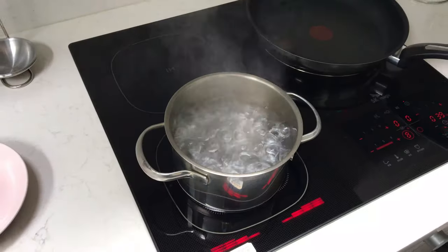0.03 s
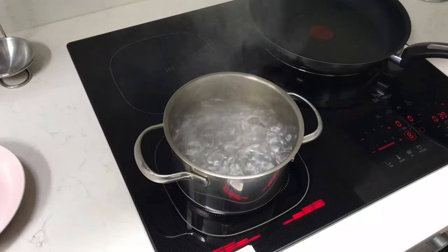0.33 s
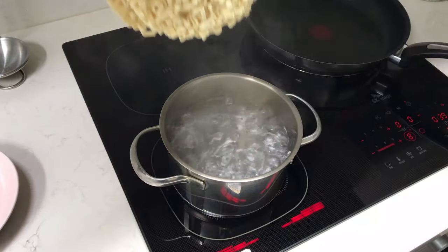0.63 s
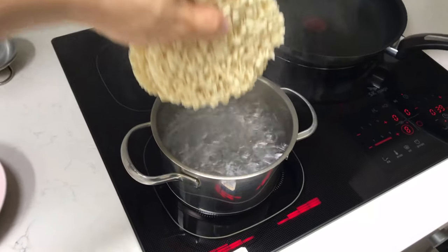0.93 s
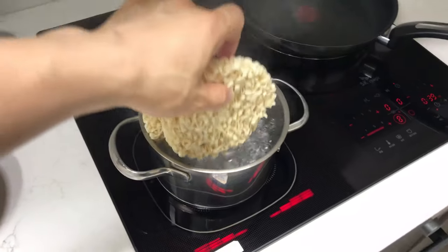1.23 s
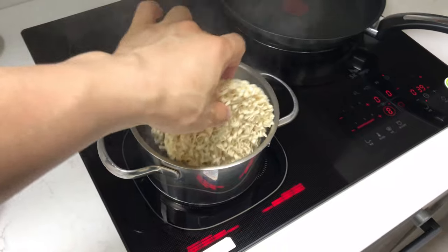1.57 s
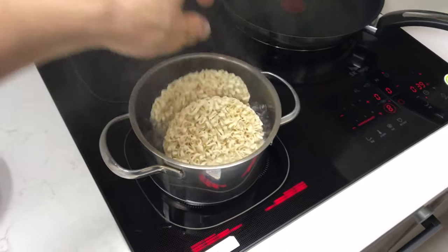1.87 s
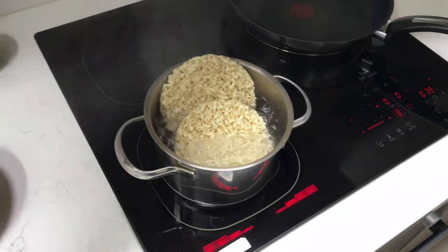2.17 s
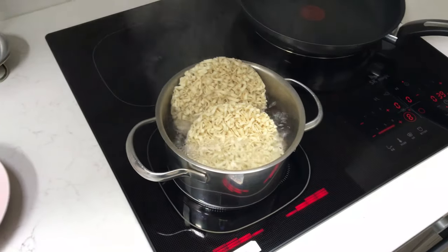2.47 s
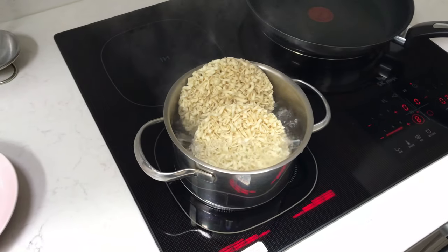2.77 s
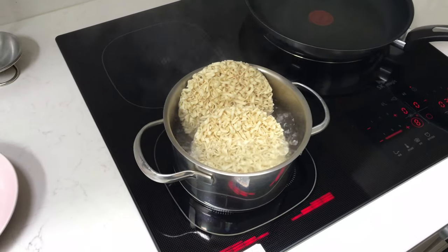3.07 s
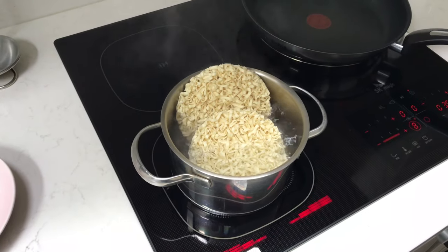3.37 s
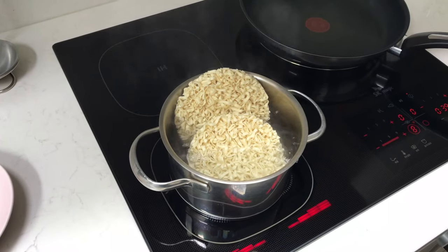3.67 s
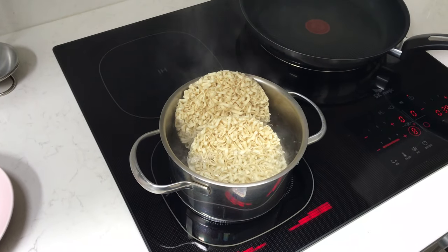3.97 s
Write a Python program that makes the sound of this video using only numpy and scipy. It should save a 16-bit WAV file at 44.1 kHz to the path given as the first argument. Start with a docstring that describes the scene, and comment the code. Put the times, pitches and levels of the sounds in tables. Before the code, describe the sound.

Water boils in a steel pot, rumbling, plopping and fizzing close by in a small kitchen. Dry noodle cakes go in with a few knocks, a scrape and crackles. The fizz then dulls while the cooktop's hum grows.

```python
"""Water boils in a steel pot in a small kitchen: a rumble, plopping bubbles and the fine fizz of foam,
over a humming cooktop. Just after the start the sound drops out for a moment. Two dry noodle cakes are
lowered in: they bump the pot and make it ring, scrape along its wall and crackle as strands snap.
They cover the water and dull the fizz, and the hum grows louder toward the end."""
import sys
import numpy as np
from scipy import signal
from scipy.fft import rfft, irfft, next_fast_len
from scipy.io import wavfile
from scipy.ndimage import map_coordinates

SR = 44100
rng = np.random.default_rng(int(sys.argv[2]) if len(sys.argv) > 2 else 0)


def to_wav(sig):
    """Store sig (one row per channel, or 1-D mono) as 16-bit WAV at the path in sys.argv[1].

    Samples outside -1..1 are clipped; the rate is SR.
    """
    pcm = np.clip(np.atleast_2d(sig), -1, 1) * 32767
    pcm = np.round(pcm).astype(np.int16)
    wavfile.write(sys.argv[1], SR, pcm.T)  # frames by channels


N = 176400
T = np.arange(N) / SR

# how long the room echoes; a t60 is the time to fade by 60 dB (frequency [Hz], t60 [s])
ROOM_DECAY = [(150, 0.24), (1500, 0.28), (12000, 0.37)]
# loudness of the cooktop's hum (time [s], level [dB])
HUM_LEVEL = [(0, -61.5), (1.5, -60), (2.2, -58), (2.65, -52.5), (3.3, -50.5), (4, -46.5)]
# tones in the hum (multiple of its pitch [-], relative level [dB])
HUM_TONES = [(1, 8), (2, -11), (3, -18.5), (4, -47)]
# tones in the fan's whine (pitch [Hz], level [dB])
FAN_TONES = [(948, -81), (1067, -73.5), (1109, -79.5), (1210, -82), (3130, -87.5), (3252, -91),
             (6840, -112)]
# tone of the surging hiss (frequency [Hz], relative level [dB])
SURGE_SPECTRUM = [(1500, 0), (3500, -1.5), (6500, -1.5), (10500, -4.5), (16000, -5.5)]
# tone of the lone tick (frequency [Hz], relative level [dB])
TICK_SPECTRUM = [(30, 13), (200, 7), (1200, -2), (4000, -13), (8000, -19), (16000, -24)]
# loudness of the open pot's low drone (time [s], level [dB])
DRONE_LEVEL = [(0, -79), (.3, -54.5), (1, -56), (1.5, -68), (2, -54), (2.3, -57.5), (4, -53)]
# where that drone rings (pitch [Hz], width [Hz], relative level [dB])
DRONE_MODES = [(107, 9.3, 0)]
# where the air above the water rings (pitch [Hz], width [Hz], gain [dB])
AIR_MODES = [(434, 51, -6), (946, 63, 8), (1070, 120, -7), (1534, 210, 2), (2860, 480, -25)]
# loudness of the boil (time [s], relative level [dB])
BOIL_LEVEL = [(0, -53.5), (.1, -55), (.25, -52), (.9, -52.5), (1.45, -53), (1.95, -49), (2.35, -54),
              (3, -53.5), (4, -52)]
# tone of the rolling water (frequency [Hz], relative level [dB])
RUMBLE_SPECTRUM = [(20, -57), (33, -11.5), (48, -14), (62, -4), (78, -5), (105, -9.5), (145, -8.5),
                   (195, -14.5), (255, -11.5), (310, -12), (420, -14.5), (520, -20.5), (780, -26.5),
                   (950, -23.5), (1500, -26), (2500, -41.5), (4000, -59)]
# loudness of the fizz (time [s], relative level [dB])
FIZZ_LEVEL = [(0, -75.5), (.07, -67), (.13, -63), (.4, -64), (1.44, -64), (1.71, -62), (1.88, -66.5),
              (2.12, -67.5), (2.34, -68), (2.7, -67.5), (3.3, -69), (4, -70)]
# tone of the fizz on open water (frequency [Hz], relative level [dB])
OPEN_SPECTRUM = [(500, -19), (1500, 4), (3000, 3), (4800, -1), (7200, -0.5), (10300, -4), (13000, -3),
                 (16000, -6.5)]
# tone of the fizz under the noodles (frequency [Hz], relative level [dB])
COVERED_SPECTRUM = [(500, -24), (1500, 9), (2400, 4), (3300, 5.5), (4700, 1), (8500, -0.5), (10400, -6),
                    (12000, -0.5), (16000, -3.5)]
# bubbles that burst clearly (time [s], peak level [dB], pitch [Hz])
CLEAR_POPS = [(0.158, -46, 2930), (0.2165, -49, 3730), (0.455, -48.5, 920), (0.535, -49, 1320),
              (.633, -42.5, 460), (0.699, -45, 2880), (.771, -45.5, 3100), (.854, -46, 896),
              (0.948, -43.5, 3020), (1.302, -46.5, 1580), (1.449, -42, 2790), (2.328, -46.5, 2570),
              (2.562, -38.5, 910), (2.819, -47, 910)]
# loudness of the cakes scraping the wall (time [s], relative level [dB])
SCRAPE_LEVEL = [(1.35, -75), (1.55, -68), (1.66, -61), (1.69, -55.5), (1.74, -54), (1.8, -55.5),
                (1.85, -68), (1.92, -72), (2.02, -64), (2.12, -62.5), (2.25, -70)]
# tone of the scrape (frequency [Hz], relative level [dB])
SCRAPE_SPECTRUM = [(300, -19), (1000, 3.5), (2200, -1.5), (3600, -1.5), (7000, -7.5), (11000, -7),
                   (16000, -15.5)]
# strands snap and drops spit (time [s], peak level [dB], pitch [Hz], t60 [s])
STRAND_SNAPS = [(.4865, -45, 7100, 0.016), (0.5704, -45.5, 6300, .027), (.7017, -30, 11800, 0.0054),
                (0.886, -44, 6300, 0.019), (1.02, -49, 6900, .019), (1.675, -38, 7460, 0.034),
                (1.6807, -28.5, 8900, 0.018), (1.731, -37, 7900, .06), (1.7825, -39, 4550, 0.047),
                (1.7966, -36, 6800, 0.004), (1.8055, -39.5, 4440, 0.016), (1.8317, -30, 12700, 0.054),
                (1.879, -38.5, 8150, 0.0036), (2.069, -46, 2300, 0.034), (2.092, -41.5, 7100, .025),
                (2.095, -42.5, 1980, 0.027), (2.121, -42.5, 2360, 0.03)]
# notes of the bumped pot and cooktop (pitch [Hz], relative level [dB], t60 [s])
POT_MODES = [(107.4, 6, 0.16), (146, 0, 0.14), (203, -14.5, 0.1), (253.3, -0.5, 0.12), (291, -6.5, 0.077),
             (351.7, -2.5, 0.16), (403, -7, 0.093), (590, -12, 0.084), (720, -13, .06), (882, -7.5, 0.058),
             (1340, -17, 0.036), (1770, -4, 0.041)]
# tone of a cake pushing on the pot (frequency [Hz], relative level [dB])
PUSH_SPECTRUM = [(50, -25), (150, 3), (400, -4.5), (560, -39), (1100, -16), (2500, -19), (6000, -38)]
# cakes bump the pot (time [s], peak level [dB], low edge of band [Hz], high edge of band [Hz])
CAKE_BUMPS = [(1.275, -28.5, 284, 890), (1.302, -37.5, 480, 1300), (1.676, -26, 90, 1420),
              (1.708, -41, 280, 1000), (1.733, -35.5, 70, 900), (1.7811, -23.5, 101, 475),
              (1.801, -44.5, 90, 330), (1.819, -33, 240, 380), (1.872, -41.5, 280, 1200),
              (2.072, -37.5, 300, 450), (2.095, -30.5, 290, 420), (2.123, -35.5, 300, 440),
              (3.066, -40, 30, 390)]

COVER_S = (1.45, 1.86)  # the cakes cover the water between these times


def amp(db):
    """Turn decibels into a gain."""
    return 10 ** (np.asarray(db) / 20)


def unit(x):
    """Scale a sound to an average (rms) level of 1."""
    return x / np.sqrt(np.mean(x ** 2) + 1e-20)


def along(points, hz):
    """Read between (frequency, value) points on a log frequency axis."""
    f, values = np.transpose(points)
    return np.interp(np.log(hz + 1), np.log(f + 1), values)


def level(rows):
    """A gain for every sample, from (time, level) points."""
    return amp(np.interp(T, *np.transpose(rows)))


def wobble(rate):
    """A smooth curve through `rate` random points a second."""
    return map_coordinates(rng.standard_normal(400), [T * rate], mode="wrap")


def filtered(x, response):
    """Multiply each frequency in a sound by response(frequency)."""
    size = next_fast_len(len(x) + 8192)
    return irfft(rfft(x, size) * response(np.fft.rfftfreq(size, 1 / SR)), size)[:len(x)]


def coloured(x, spectrum):
    """Shape a sound's tone, then scale it to level 1."""
    return unit(filtered(x, lambda f: amp(along(spectrum, f))))


def ringing(modes, f):
    """The response of something that rings at a few pitches, called its modes."""
    return sum((-1) ** k * amp(db) * 1j * f * width / (hz * hz - f * f + 1j * f * width)
               for k, (hz, width, db) in enumerate(modes))


def fade(t, t60):
    """A gain that falls by 60 dB every t60 seconds."""
    return amp(-60 * t / t60)


def add(track, start, x, peak_db):
    """Place a sound at a time with a peak level."""
    part = track[round(start * SR):][:len(x)]
    part += amp(peak_db) * x[:len(part)] / np.abs(x).max()


def clicks(count, spread_db):
    """Tiny clicks of uneven size at random times."""
    when, strength, side = rng.random((count, 3)).T
    size = amp(spread_db * np.minimum(-np.log(strength), 5)) * np.sign(side - .5)
    return unit(np.bincount((when * N).astype(int), size, N))


def drone(modes):
    """Noise held in narrow bands, so that it sounds almost like a note."""
    return unit(filtered(rng.standard_normal(N), lambda f: ringing(modes, f) ** 2))


def bubble(t, hz, cycles, rise=0.077):
    """A ring that dies away over `cycles` swings and rises in pitch as the bubble surfaces."""
    age = t * hz / cycles
    attack = 1 - np.exp(-2 * t * hz)
    return np.sin(2 * np.pi * hz * t * (1 + rise * age / 2)) * amp(-60 * age) * attack


def swarm(count, low_hz, high_hz, cycles, spread_db):
    """Many short bubble-like rings of random pitch, strength and time."""
    pitch, strength, when = rng.random((count, 3)).T[:, :, None]
    samples = np.arange(SR // 25)
    rings = bubble(samples / SR, low_hz * (high_hz / low_hz) ** pitch, cycles)
    rings *= amp(spread_db * np.minimum(-np.log(strength), 4))
    positions = (when * N).astype(int) + samples
    return unit(np.bincount(positions.ravel(), rings.ravel(), N)[:N])


def kitchen(x):
    """The room's short echo: a tail of fading noise that starts 5 ms late."""
    hz, t, bands = signal.stft(rng.standard_normal(SR // 2), SR, nperseg=256)
    tail = signal.istft(bands * fade(t, along(ROOM_DECAY, hz)[:, None]), SR, nperseg=256)[1]
    return signal.fftconvolve(np.pad(x, (SR // 200, 0)), tail / np.linalg.norm(tail))[:N]


def cooktop(hum_hz=120.84, fan_hz=252, fan_width_hz=19):
    """Mains hum that swells, with the fan's drone and faint whine."""
    phase = 2 * np.pi * hum_hz * T + .2 * wobble(5)
    hum = unit(sum(amp(db + wobble(10)) * np.sin(k * phase) for k, db in HUM_TONES))
    whine = sum(amp(db) * unit(np.sin(2 * np.pi * hz * T + wobble(10))) for hz, db in FAN_TONES)
    return level(HUM_LEVEL) * hum + whine + amp(-60.5) * drone([(fan_hz, fan_width_hz, 0)])


def surges(first_s=0.241, period_s=.686, length_s=0.13, ramp_s=0.023):
    """A faint high hiss that comes and goes at an even pace."""
    from_middle_s = np.abs((T - first_s + period_s / 2) % period_s - period_s / 2)
    gate = np.clip((length_s / 2 - from_middle_s) / ramp_s + .5, 0, 1)
    return amp(-66.5) * gate * coloured(rng.standard_normal(N), SURGE_SPECTRUM)


def tick(time_s=3.074, peak_db=-34):
    """One faint dry tick, like a tiny knock."""
    knock = coloured(signal.unit_impulse(N, round(time_s * SR)), TICK_SPECTRUM)
    return amp(peak_db) * knock / np.abs(knock).max()


def boil():
    """Rolling water rumbles and the pot drones; the noodles calm the large and small bubbles."""
    rumble = coloured(rng.standard_normal(N), RUMBLE_SPECTRUM) * amp(-1 + 1.8 * wobble(13))
    large = swarm(count=450, low_hz=199.4, high_hz=422, cycles=14, spread_db=1)
    small = swarm(count=1000, low_hz=528, high_hz=2330, cycles=10.4, spread_db=3.5)
    in_pot = unit(filtered(small, lambda f: 0.61 + ringing(AIR_MODES, f)))  # direct sound + ringing air
    gulps = amp(np.interp(T, COVER_S, (-9, -15))) * large
    plops = amp(np.interp(T, COVER_S, (-12, -14))) * in_pot
    return level(BOIL_LEVEL) * (rumble + gulps + plops) + level(DRONE_LEVEL) * drone(DRONE_MODES)


def fizz():
    """Fine foam bursts and beads of air ring, duller once the noodles lie on the water."""
    covered = np.interp(T, COVER_S, (0, 1))
    foam = rng.standard_normal(N) + amp(-7.5) * clicks(count=3500, spread_db=5.5)
    spray = coloured(foam, OPEN_SPECTRUM) * amp(1.35 * wobble(26.56))
    beads = amp(-11) * swarm(count=200, low_hz=2420, high_hz=7500, cycles=18, spread_db=4)
    covered_foam = rng.standard_normal(N) + amp(-8) * clicks(count=1500, spread_db=4)
    open_fizz = np.sqrt(1 - covered) * amp(1.5) * (spray + beads)
    dull_fizz = np.sqrt(covered) * amp(2) * coloured(covered_foam, COVERED_SPECTRUM)
    return level(FIZZ_LEVEL) * (open_fizz + dull_fizz)


def pops(cycles=20.6, gurgle_s=.08, gurgle_db=-9.5):
    """Single bubbles ring as their film breaks with a splash; three smaller ones gurgle after each."""
    out, t = np.zeros(N), np.arange(SR // 10) / SR
    for start, db, hz in CLEAR_POPS:
        puff = rng.standard_normal(len(t)) * fade(t, t60=0.022)
        splash = filtered(puff, lambda f: ringing([(hz, 0.3 * hz, 0)], f) ** 2)
        splash *= amp(-6.5) * hz / 2000 / np.abs(splash).max()  # small, high bubbles splash most
        add(out, start, bubble(t, hz, cycles, rise=0.051) + splash, db)
        for late, higher in rng.random((3, 2)):
            gurgle = bubble(t, hz * (1 + higher / 2), cycles)
            add(out, start + gurgle_s * late, gurgle, db + gurgle_db * (1 + late / 2))
    return out


def scrape():
    """Dry noodles rub the wall in tiny puffs of noise and ringing grit, only while the cakes move."""
    t = np.arange(SR // 20) / SR
    catches = np.abs(clicks(count=2800, spread_db=3))
    puffs = signal.fftconvolve(catches, fade(t, t60=0.0088))[:N] * rng.standard_normal(N)
    rub = coloured(puffs, SCRAPE_SPECTRUM)
    grit = amp(-6) * swarm(count=1200, low_hz=2770, high_hz=7250, cycles=14, spread_db=2)
    moving = (T > SCRAPE_LEVEL[0][0]) & (T < SCRAPE_LEVEL[-1][0])
    return moving * level(SCRAPE_LEVEL) * (rub + grit)


def snaps():
    """Dry strands break and drops spit: a sharp crack, then splintering and a faint tail."""
    out, t = np.zeros(N), np.arange(SR // 10) / SR
    crack = amp(-1) * fade(t, t60=0.0012)
    tail = amp(-17) * fade(t, t60=0.051)
    for start, db, hz, t60 in STRAND_SNAPS:
        burst = rng.standard_normal(len(t)) * (crack + fade(t, t60) + tail)
        add(out, start, filtered(burst, lambda f: ringing([(hz, 1.08 * hz, 0)], f) ** 2), db)
    return out


def bumps(attack_s=0.0021, scatter_db=2, slosh_detune=.015):
    """Each blow of a cake sets the pot ringing, over the noise of the push and the crumbling strands."""
    out, t = np.zeros(N), np.arange(SR // 4) / SR
    mode_hz, mode_db, t60 = np.transpose(POT_MODES)[:, :, None]
    signs = (-1) ** np.arange(len(POT_MODES))[:, None]
    attack = 1 - np.exp(-t / attack_s)
    push_and_crumble = fade(t, t60=0.027) + amp(-16.5) * fade(t, t60=0.085)
    for start, db, low_hz, high_hz in CAKE_BUMPS:
        def band(f):
            """Where and how hard the blow lands picks the pitches that sound."""
            return (f / low_hz) ** 2 / np.sqrt((1 + (f / low_hz) ** 4) * (1 + (f / high_hz) ** 4))

        strength, shift = rng.standard_normal((2, len(POT_MODES), 1))
        hz = mode_hz * (1 + slosh_detune * shift)  # moving water shifts the pot's notes
        gains = signs * band(mode_hz) * amp(mode_db + scatter_db * strength)
        ring = unit(np.sum(gains * fade(t, t60) * np.sin(2 * np.pi * hz * t), axis=0))
        grains = filtered(coloured(rng.standard_normal(len(t)), PUSH_SPECTRUM), band)
        push = amp(-2) * unit(grains * push_and_crumble)
        add(out, start, (ring + push) * attack, db)
    return out


def scene():
    """Mix the pot, its echo, the cooktop and the faint hiss into one channel."""
    pot = boil() + fizz() + pops() + bumps() + snaps() + scrape() + tick()
    return (pot + amp(-11) * kitchen(pot) + cooktop() + surges())[None]


def record(dry):
    """The sound drops out briefly near the start, and the very highest treble is cut."""
    dip_start_s, dip_end_s, top_hz = .0795, .1025, 15900
    dip = np.where((T < dip_start_s) | (T > dip_end_s), 1, amp(-35))
    return filtered(dry[0] * dip, lambda f: f < top_hz)[None]


dry = scene()
out = record(dry)
to_wav(out)
```